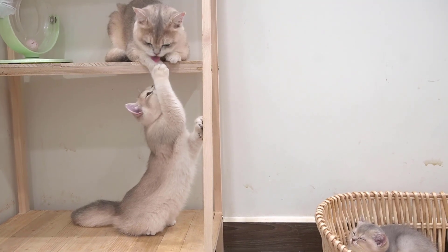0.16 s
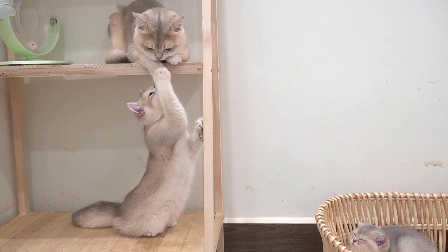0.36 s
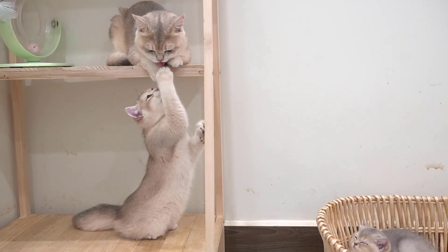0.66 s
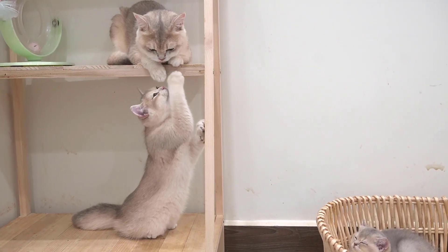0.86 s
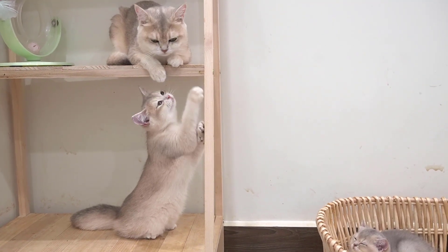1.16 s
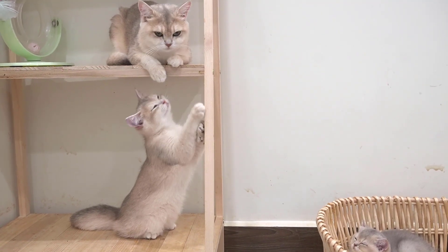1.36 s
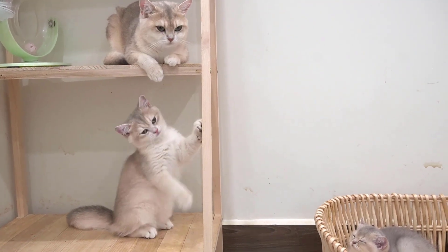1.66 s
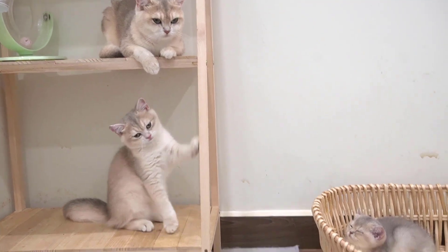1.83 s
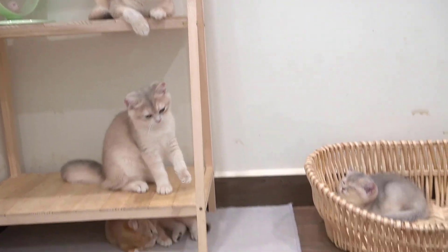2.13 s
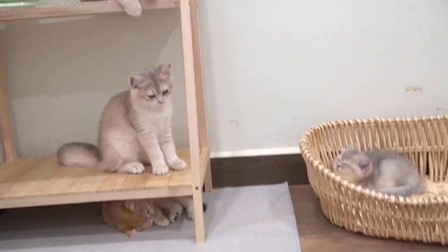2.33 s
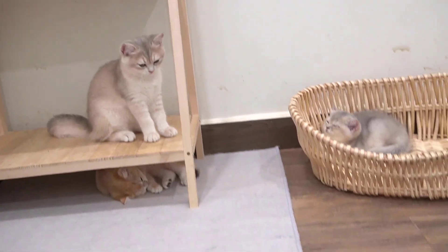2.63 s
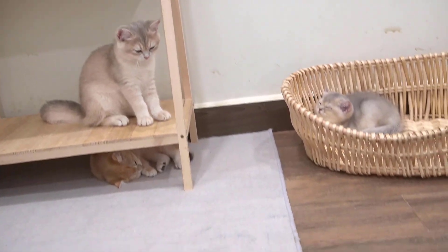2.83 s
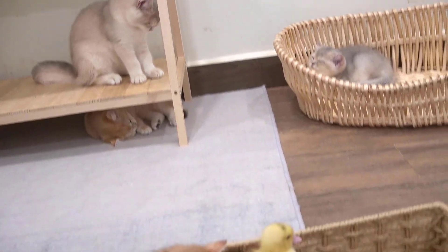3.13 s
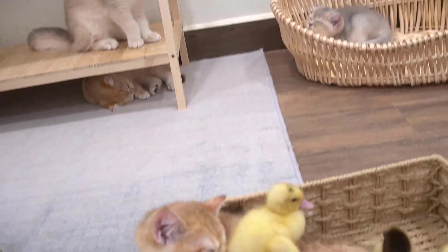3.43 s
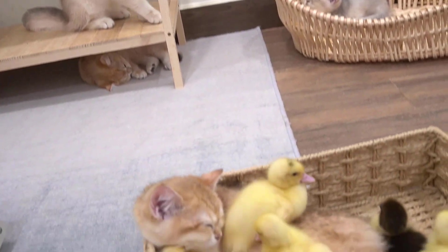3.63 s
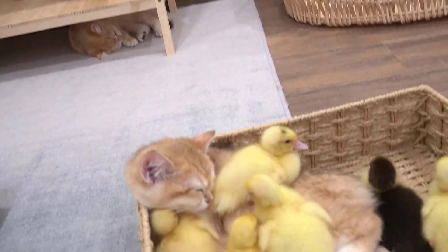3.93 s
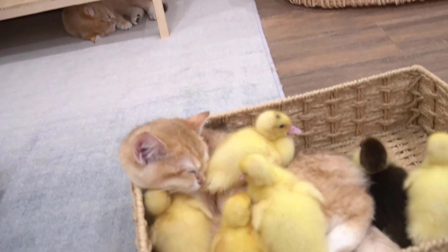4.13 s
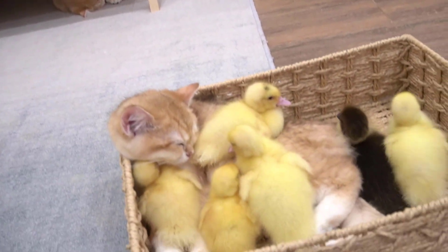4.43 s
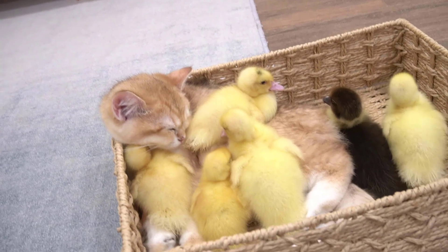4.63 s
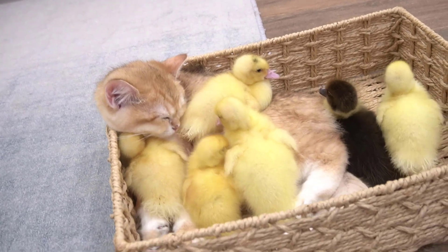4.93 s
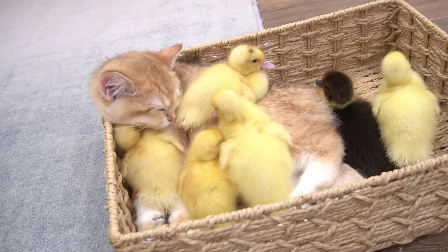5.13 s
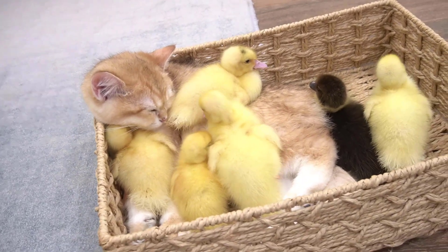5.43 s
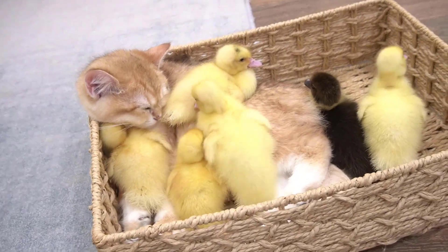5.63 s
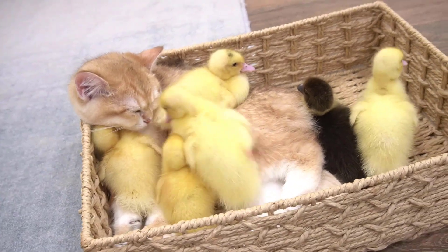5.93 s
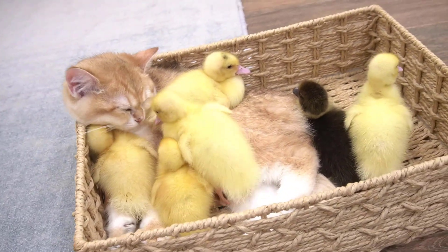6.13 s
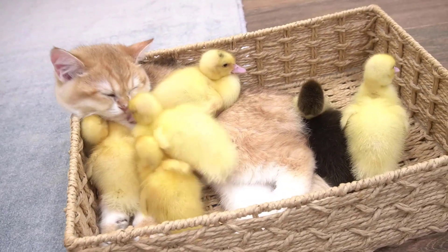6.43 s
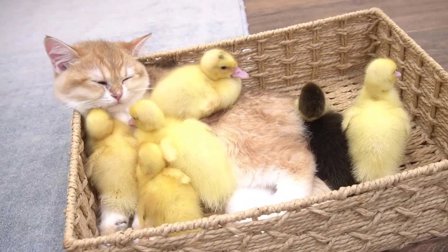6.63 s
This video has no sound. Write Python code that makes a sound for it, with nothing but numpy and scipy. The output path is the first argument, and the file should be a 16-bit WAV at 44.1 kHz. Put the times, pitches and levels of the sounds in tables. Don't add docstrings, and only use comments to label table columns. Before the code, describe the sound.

Thin, nearly pure duckling peeps glide around three kilohertz, each lasting under a tenth of a second. A regular opening series gives way to short mixed peeps with beak ticks and hoarse basket scrapes, then to bright descending calls, loudest and steadiest at the close. Downy rustles follow the birds, and a body slides softly once. Live small-room echoes and a low distant motor sit beneath, heard in stereo by a moving camera microphone.

```python
import sys
import numpy as np
from scipy import signal
from scipy.fft import rfft, irfft
from scipy.io import wavfile
from scipy.ndimage import uniform_filter1d

SR = 44100
rng = np.random.default_rng(int(sys.argv[2]) if len(sys.argv) > 2 else 0)


def file_out(sig):
    cols = np.atleast_2d(sig).T
    lim = np.clip(cols, -1, 1)
    pcm = np.round(lim * 32767).astype(np.int16)
    wavfile.write(sys.argv[1], SR, pcm)


def volts_from_decibels(level):
    exponent = np.asarray(level, float) / 20
    return 10 ** exponent


N = 298557

# (time [s], length [ms], level [dB], start [Hz], top [Hz])
ARCHED_PEEPS = [(-.025, 71.3, -26.5, 2760, 3003), (.205, 69, -27, 2532, 2970), (.446, 48, -30, 2720, 2781),
                (.714, 53, -39, 2680, 2730), (.962, 58, -33, 2640, 2870), (1.106, 80, -34.5, 2766, 2796),
                (1.352, 60, -32, 2950, 2810), (1.554, 69, -32, 2734, 2903), (1.779, 68, -32, 3200, 2910),
                (2.021, 62, -29.5, 2740, 2812), (2.258, 72, -29.5, 2690, 2990),
                (2.508, 74, -29.5, 2560, 3012), (3.236, 69, -36, 2700, 3063), (3.378, 75, -37, 3360, 3050),
                (3.768, 85, -35.5, 3746, 3140)]
# (time [s], length [ms], level [dB], start [Hz], end [Hz])
FALLING_PEEPS = [(1.039, 29, -57, 3490, 2690), (1.385, 31, -57, 3720, 2800), (1.513, 32, -53.5, 4060, 2700),
                 (3.649, 37, -44.5, 4145, 2480), (3.759, 60, -45.5, 4426, 2970),
                 (3.908, 51, -39.5, 4480, 2715), (4.144, 37, -43.5, 4206, 2540),
                 (4.58, 31, -43, 4055, 2770), (4.695, 49, -35, 4366, 2700),
                 (4.952, 56.4, -32.5, 4950, 2783), (5.208, 60, -31, 4770, 2780)]
# (time [s], length [ms], level [dB], top [Hz], middle [Hz])
HOOKED_PEEPS = [
    (5.437, 58, -28, 4490, 3130),
    (5.653, 61, -26, 4500, 3140),
    (5.869, 62.3, -25.5, 4650, 3147),
    (6.082, 68.7, -25.5, 4645, 3133),
    (6.301, 68, -25.5, 4650, 3110),
    (6.527, 63.6, -26, 4600, 3100),
]
# (time [s], length [ms], level [dB], start [Hz], middle [Hz])
SHORT_PEEPS = [(0, 10.8, -39.5, 3230, 3037), (.016, 36, -53.5, 3087, 3065), (.165, 36.6, -49.5, 3154, 3050),
               (1.148, 28.5, -45, 3330, 3110), (2.635, 9.4, -46.5, 2910, 2810),
               (2.699, 12, -37, 3240, 2957), (2.758, 15.5, -41.5, 3130, 2710), (2.953, 8, -41, 3220, 2910),
               (3.025, 9.9, -47.5, 3210, 2680), (3.14, 22, -57, 3150, 3044), (3.255, 13, -51, 2900, 2610),
               (3.535, 38, -36, 3406, 3010), (3.79, 9, -41.5, 2930, 2955), (3.94, 28.7, -37, 3267, 2941),
               (4.184, 20, -37.5, 2990, 2937), (4.336, 47.7, -33, 3264, 2890),
               (4.602, 31, -38.5, 3030, 2958), (4.771, 35.3, -34.5, 3037, 2960),
               (5.185, 19, -50, 2930, 2700)]
# (time [s], overtones [dB], left-right [dB], room [dB])
ARCHED_FACING = [(0, -12, -7, -6), (.5, -16, -2, -7), (.9, -10.5, -1, -3), (1.3, -7.5, -8.5, -3),
                 (1.8, -5.5, -4, -2), (2.0, -14, -5, -3), (2.6, -16.5, -5, -5.5), (3.2, -6, -4, -4),
                 (3.8, -6.5, -2, -7)]
FALLING_FACING = [(1.0, -14, -25, 11.5), (1.6, -20, -23, 12.5), (3.6, -9, -14, 3), (3.8, -16, -26, 7),
                  (4.0, -10, -12, 0), (4.5, -10, -10, 1.5), (4.9, -8.5, -7, -2), (5.3, -6, -7, -4.5)]
HOOKED_FACING = [(5.401, -5.5, -6.5, -5), (5.75, -6, -8, -4.5), (6.0, -5, -9.5, -3.5),
                 (6.3, -5, -9.5, -3.5), (6.6, -7, -9.5, -3.5)]
SHORT_FACING = [(0, -13, -10, 4.5), (2.64, -10, -2, 1.5), (2.76, -15, -5, -3.5), (2.94, -30, -5, -2),
                (3.1, -38, -3, 4), (3.5, -8.5, -7, 1.5), (4.2, -7.5, -3, -3.5), (4.8, -4.5, -2, -7),
                (5.2, -33, -3, -8.5)]
# (start level [dB], full effort reached [share], fade counted from [share], end level [dB])
ARCHED_EFFORT = (-5, 0.45, 0.88, -14)
FALLING_EFFORT = (-12, 0.08, 0.7, -9.5)
HOOKED_EFFORT = (-9.5, 0.62, 0.3, -12)
SHORT_EFFORT = (-6.5, 0.48, 0.75, -3.5)
# (start [Hz], share of length [1])
DROP_SHARE = [(4500, 0.433), (4900, 0.21)]
# (frequency [Hz], gain [dB])
WHISTLE_THROAT = [(2300, -9), (2650, 0.5), (3000, 0), (3400, 3), (3900, -5.5), (4300, -9), (4700, -3.5)]
# (frequency [Hz], gain [dB])
OVERTONE_THROAT = [(4600, -5), (5200, -7), (6000, -9.5), (6600, -15), (7500, -19.5), (9400, -30.5)]
# (time [s], length [ms], start [Hz], level [dB], sum tone [dB])
SQUEAKS = [
    (3.946, 30, 1960, -50, -1),
    (4.187, 23, 1900, -43, -13),
    (4.601, 14, 1760, -55, -13),
    (4.764, 9.1, 1890, -47, -19),
    (4.775, 17, 1610, -58, -3),
]
# (time [s], peak [dB], centre [Hz], crack [dB])
TICKS = [(0.145, -67, 2100, 4), (0.163, -44, 2060, 7.5), (0.31, -42.5, 2200, 2), (0.334, -53, 2100, -4),
         (0.4335, -45, 2180, 7), (0.9535, -47, 1030, -16), (1.028, -85.5, 1750, -8),
         (1.149, -40.5, 2240, -17), (1.502, -38.5, 2020, 0.5), (2.1805, -41, 1000, 1),
         (2.3134, -35, 2340, -5), (2.693, -46, 1770, -3), (2.699, -41, 2000, -3), (2.9545, -37, 2070, -2),
         (2.965, -44, 2400, -4), (3.033, -43, 2300, -4), (3.1376, -43.5, 2020, 1), (3.367, -46, 1720, 0),
         (3.531, -49, 1900, 14), (3.543, -52, 2070, 12), (3.7732, -41, 2390, 7.5), (3.9322, -34.5, 2160, 5),
         (3.941, -45, 1940, -7), (4.175, -38.5, 1720, -19), (4.333, -44, 1980, -8), (4.343, -40, 1530, 8),
         (4.4584, -67, 2130, 1), (4.504, -52, 1120, -7), (4.594, -41.5, 1730, -11), (4.766, -51, 1900, -26),
         (5.8724, -55, 2020, -10), (6.5914, -62, 980, -6)]
# (time [s], length [ms], level [dB], dull ring [dB])
RASPS = [
    (2.691, 16.4, -46, -6),
    (2.95, 4.6, -54, -5.5),
    (3.03, 7.9, -71, -3),
    (3.772, 25, -54, -26),
    (3.94, 23, -52, -16),
    (4.334, 6.5, -50.5, -17),
    (4.594, 9.5, -61, -6),
    (4.765, 10, -49, -36),
    (1.52, 14, -50, -10),
    (2.199, 16, -58, -10),
]
# (time [s], level [dB])
STIRS = [(.05, -68), (.99, -64), (1.2, -76), (1.55, -77), (2.34, -62.5), (2.55, -60), (3.58, -57),
         (3.94, -65), (4.18, -68), (4.35, -65), (4.512, -62), (6.6, -70)]
# (frequency [Hz], level [dB])
RUSTLE_COLOUR = [(600, -3.5), (1500, 11.5), (4000, 14.5), (8000, 6.5), (12000, 9), (15600, 12)]
# (frequency [Hz], level [dB])
SLIDE_COLOUR = [(80, 2), (300, 8.5), (800, 8), (1300, 1.5), (3000, 7), (6000, -32)]
# (frequency [Hz], level [dB])
HUM_LINES = [(107, -81), (134, -69.5), (160, -67.5), (212, -64.5), (250, -70), (304, -74), (322, -77)]
# (time [s], level [dB])
MOTOR_LOAD = [
    (0.0, -74),
    (0.13, -47),
    (0.34, -69),
    (2.07, -48.5),
    (2.22, -58.5),
    (4.16, -49),
    (4.43, -56),
    (6.15, -47.5),
    (6.69, -48.5),
    (6.77, -70),
]
# (frequency [Hz], density [dB/Hz])
AIR_COLOUR = [(30, -102), (50, -93.5), (100, -80), (200, -85.5), (310, -76.5), (450, -90.5), (800, -88.5),
              (1200, -98.5), (2100, -99), (3200, -94), (4300, -102), (8000, -107), (13000, -108),
              (15600, -122)]
# (frequency [Hz], left-right correlation [1])
LIKENESS = [(25, 1), (180, 0.87), (400, 0.77), (800, 0.18), (1650, 0.023), (5000, 0.028), (15000, 0.35)]
# (delay [ms], left [dB], right [dB])
ECHOES = [
    (1.375, -28, -17),
    (3.02, -20, -31),
    (4.604, -3, -34),
    (7.52, -5, -24.5),
    (11.42, -10, -16),
    (16.14, -9.5, -6),
    (27.5, -14, -17),
    (41.16, -18, -15),
    (68.15, -12, -11),
    (93, -27, -25.5),
]
# (frequency [Hz], t60 [s])
ROOM_T60 = [(500, 0.74), (2000, 0.7), (4000, 0.66), (8000, 0.5), (15000, 0.11)]


def duckling(peeps, glide, effort, facing, third_db, gap_s):
    tone, second, third = np.zeros((3, N))
    wobble = 1 + .002 * drift(90)
    first_db, full, fading, last_db = effort
    for s, ms, db, *pitch_hz in peeps:
        u = np.linspace(0, 1, round(ms * SR / 1000))
        hz = glide(u, *pitch_hz) * np.roll(wobble, -round(s * SR))[:len(u)]
        phase = 2 * np.pi * np.cumsum(hz) / SR
        effort_db = np.interp(u, [0, full, fading, 1], [first_db, 0, 0, last_db])
        level = np.sqrt(2) * volts_from_decibels(db + effort_db) * signal.windows.tukey(len(u), .15)
        add(tone, s, level * volts_from_decibels(read(WHISTLE_THROAT, hz)) * np.sin(phase))
        add(second, s, level * volts_from_decibels(read(OVERTONE_THROAT, 2 * hz) - 32 * u ** 3) * np.sin(2 * phase))
        add(third, s, level * np.sin(3 * phase))
    overtone_db, pan_db, room_db = along(facing)
    upper = volts_from_decibels(overtone_db + 3.3 * drift(215)) * (second + volts_from_decibels(third_db) * third)
    voice = tone * volts_from_decibels(.8 * drift(220) + 1.3 * drift(45))
    fade_in = np.clip(np.arange(N) / 200, 0, 1)
    walls = (voice + upper) * volts_from_decibels(room_db + 2.43 * drift(31)) * fade_in
    direct = (voice + upper) * volts_from_decibels([pan_db / 2, -pan_db / 2])
    return direct + nearby(walls) + room(walls, gap_s)


def arch(u, start_hz, top_hz):
    top_share, end_hz = .27, 2253
    rise = np.clip(1 - u / top_share, 0, 1) ** 2
    slide = np.clip((u - top_share) / (1 - top_share), 0, 1) ** 1.255
    return top_hz - (top_hz - start_hz) * rise - (top_hz - end_hz) * slide


def fall(u, start_hz, end_hz, middle_hz=3130, hold=0, late=1.296, steep=None):
    steep = steep or read(DROP_SHARE, start_hz)
    drop = np.exp(-np.clip(u - hold, 0, 1) / steep)
    left = np.exp(-(.5 - hold) / steep)
    drop = np.clip((drop - left) / (1 - left), 0, 1)
    droop = np.clip(2 * u - 1, 0, 1) ** late
    return middle_hz + (start_hz - middle_hz) * drop - (middle_hz - end_hz) * droop


def hook(u, top_hz, middle_hz):
    hz = fall(u, top_hz, 2680, middle_hz, hold=0.11, late=2.05, steep=0.2)
    return uniform_filter1d(hz, size=200, mode="nearest")


def dip(u, start_hz, middle_hz):
    droop_hz = 83 * np.clip(2 * u - 1, 0, 1)
    return middle_hz + (start_hz - middle_hz) * np.clip(1 - 2 * u, 0, 1) ** 2 - droop_hz


def squeaks():
    sink_hz_per_ms = 8.7
    out, wobble = np.zeros(N), 1 + 0.045 * drift(300)
    for s, ms, start_hz, db, sum_db in SQUEAKS:
        u = np.linspace(0, 1, round(ms * SR / 1000))
        hz = (start_hz - sink_hz_per_ms * ms * u) * wobble[round(s * SR):][:len(u)]
        fold = 2 * np.pi * np.cumsum(hz) / SR
        whistle = 2 * np.pi * np.cumsum(2900 + 400 * np.exp(-u / 0.17)) / SR
        tones = np.sin(fold) + volts_from_decibels(sum_db) * np.sin(fold + whistle)
        add(out, s, volts_from_decibels(db) * tones * signal.windows.tukey(len(u), .5))
    out *= volts_from_decibels(4 * drift(180))
    return out + volts_from_decibels(-10) * room(out, 0.0046)


def ticks():
    out, t = np.zeros(N), np.arange(400) / SR
    lowpass = signal.butter(2, 7500, fs=SR)
    cracks = signal.lfilter(*lowpass, rng.standard_normal((len(TICKS), 400)))
    for (s, db, hz, bright_db), crack in zip(TICKS, cracks):
        knock = np.sin(2 * np.pi * hz * t) * np.exp(-t / 0.00045)
        add(out, s, volts_from_decibels(db) * (knock + volts_from_decibels(bright_db - 4.5) * crack * np.exp(-t / 0.00066)))
    return out + volts_from_decibels(4.5) * room(out, 0.0024)


def rasps():
    broad, dull = np.zeros((2, N))
    for s, ms, db, dull_db in RASPS:
        shape = volts_from_decibels(db) * signal.windows.tukey(round(ms * SR / 1000), .5)
        add(broad, s, shape)
        add(dull, s, shape * volts_from_decibels(dull_db))
    grit = rng.standard_normal(N) * volts_from_decibels(3 * drift(300))
    mids = signal.lfilter(*signal.butter(2, [1560, 4200], "band", fs=SR), grit)
    ring = signal.lfilter(*signal.butter(2, [1000, 1480], "band", fs=SR), grit)
    out = broad * evened(mids) + dull * evened(ring)
    return out + volts_from_decibels(2.5) * room(out, .003)


def rustles():
    rest_db, jerk_db = -67, -41
    level = volts_from_decibels(rest_db)
    for s, _, db, *_ in ARCHED_PEEPS + FALLING_PEEPS + HOOKED_PEEPS:
        level = level + swell(s + 0.022, db + jerk_db, rise_s=0.023, fade_s=0.064)
    for s, db in STIRS:
        level = level + swell(s, db, rise_s=0.024, fade_s=0.11)
    level = level + swell(1.9, -51, rise_s=.055, fade_s=.09)
    level = level * volts_from_decibels(0.66 * drift(150) + 0.68 * drift(22))
    slide = swell(1.96, -46.5, rise_s=.1, fade_s=.12) * volts_from_decibels(2.2 + 1.34 * drift(28))
    return noise(RUSTLE_COLOUR, patchy_db=3.5) * level + noise(SLIDE_COLOUR, patchy_db=5.0) * slide


def hum():
    t, lines = np.arange(N) / SR, np.zeros(N)
    for hz, db in HUM_LINES:
        lines += volts_from_decibels(db + 2.6 * drift(9.6)) * np.sin(2 * np.pi * (hz * t + 0.3 * drift(3.45)))
    return 1.91 * lines * volts_from_decibels(along(MOTOR_LOAD)[0] + 50)


def noise(colour, patchy_db):
    hz = np.fft.rfftfreq(1024, 1 / SR)
    a, b, c, d, patches = rng.standard_normal((N // 256 + 5, 513, 5)).T
    patches = uniform_filter1d(patches, size=12, axis=0)
    patches = evened(uniform_filter1d(patches, size=10, axis=1))
    same = np.clip(read(LIKENESS, hz), -1, 1)[:, None]
    left = a + 1j * b
    right = same * left + np.sqrt(1 - same ** 2) * (c + 1j * d)
    z = np.array([left, right]) * volts_from_decibels(read(colour, hz)[:, None] + patchy_db * patches)
    return evened(signal.istft(z, nperseg=1024, noverlap=768)[1][:, :N])


def nearby(x):
    taps = np.zeros((2, SR // 8))
    for k, (ms, *ears_db) in enumerate(ECHOES):
        taps[:, round(ms * SR / 1000)] = (-1) ** k * volts_from_decibels(ears_db)
    return signal.oaconvolve(x[None], taps, axes=1)[:, :N]


def room(x, gap_s):
    taps = np.zeros((2, SR))
    at = np.arange(round(gap_s * SR), SR - 20, 20)
    at = at + rng.integers(0, 20, (2, SR // 20))[:, :len(at)]
    signs = rng.choice([-1., 1.], (2, SR // 20))[:, :at.shape[1]]
    np.put_along_axis(taps, at, signs, 1)
    hz, t, z = signal.stft(taps, SR, nperseg=256)
    decay = volts_from_decibels(-60 * t / read(ROOM_T60, hz)[:, None])
    tail = signal.istft(z * decay, SR, nperseg=256)[1]
    tail[1] = 0.55 * tail[0] + 0.95 * tail[1]
    return signal.fftconvolve(x[None], tail / np.linalg.norm(tail[0]), axes=1)[:, :N]


def swell(s, db, rise_s, fade_s):
    t = np.arange(N) / SR - s
    return volts_from_decibels(db) * np.exp(-.5 * (t / np.where(t < 0, rise_s, fade_s)) ** 2)


def drift(rate_hz):
    hz = np.fft.rfftfreq(N, 1 / SR)
    return evened(irfft(rfft(rng.standard_normal(N)) / (1 + (hz / rate_hz) ** 4), N))


def evened(x):
    return x / np.sqrt(np.mean(x ** 2) + 1e-20)


def read(points, hz):
    f, value = np.transpose(points)
    return np.interp(np.log(hz + 1), np.log(f + 1), value)


def along(rows):
    s, *columns = np.transpose(rows)
    return [np.interp(np.arange(N) / SR, s, c) for c in columns]


def add(mix, s, sound):
    at = round(s * SR)
    sound = sound[max(-at, 0):]
    part = mix[max(at, 0):][:len(sound)]
    part += sound[:len(part)]


def scene():
    birds = volts_from_decibels(-3.0) * duckling(ARCHED_PEEPS, arch, ARCHED_EFFORT, ARCHED_FACING, third_db=-38, gap_s=.005)
    birds += duckling(FALLING_PEEPS, fall, FALLING_EFFORT, FALLING_FACING, third_db=-32.5, gap_s=.004)
    birds += duckling(HOOKED_PEEPS, hook, HOOKED_EFFORT, HOOKED_FACING, third_db=-37.5, gap_s=0.01)
    birds += volts_from_decibels(6.0) * duckling(SHORT_PEEPS, dip, SHORT_EFFORT, SHORT_FACING, third_db=-34.0, gap_s=0.0023)
    contacts = ticks() + rasps() + rustles()
    air = volts_from_decibels(-53.5) * noise(AIR_COLOUR, patchy_db=1.5)
    return birds + squeaks() + contacts + hum() + air


def low_pass(x):
    return signal.sosfilt(signal.butter(12, 15630, fs=SR, output="sos"), x)


def record(dry):
    edge = signal.firwin(255, 15450, window=("kaiser", 8), fs=SR)
    mix = signal.oaconvolve(dry, edge[None], "same")
    return low_pass(mix)


dry = scene()
out = record(dry)
file_out(out)
```